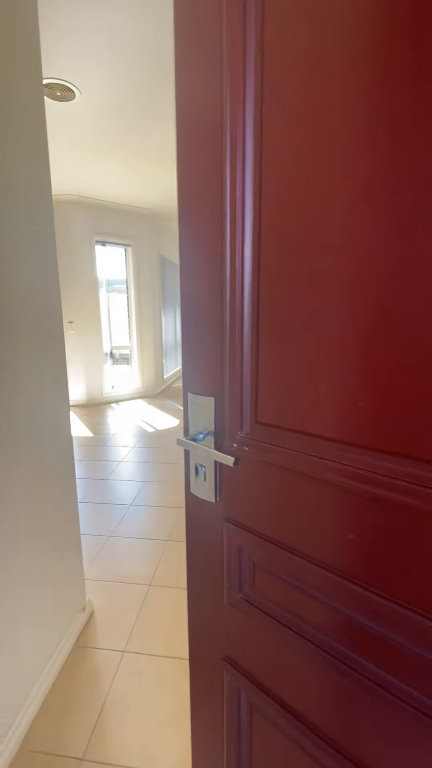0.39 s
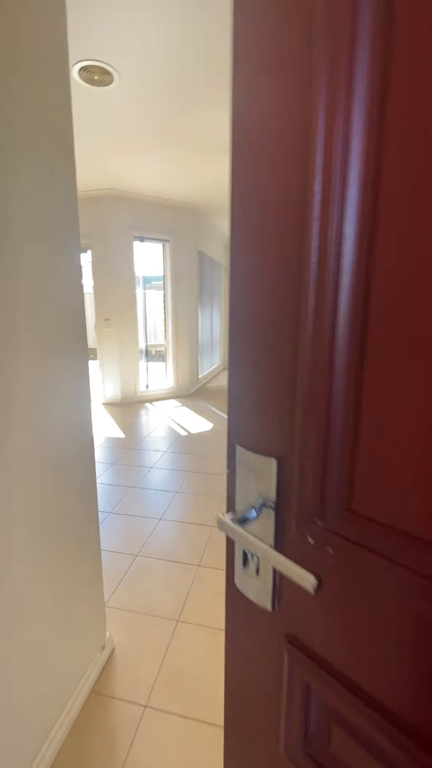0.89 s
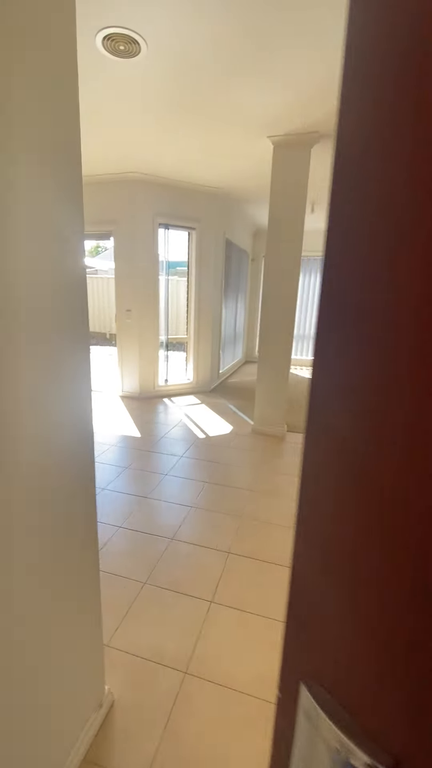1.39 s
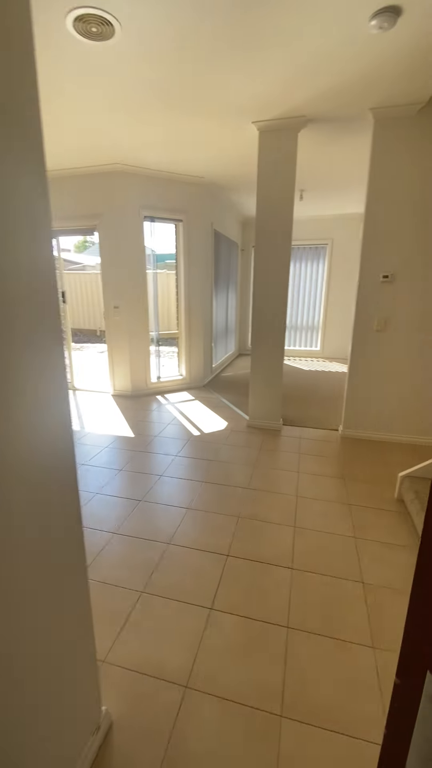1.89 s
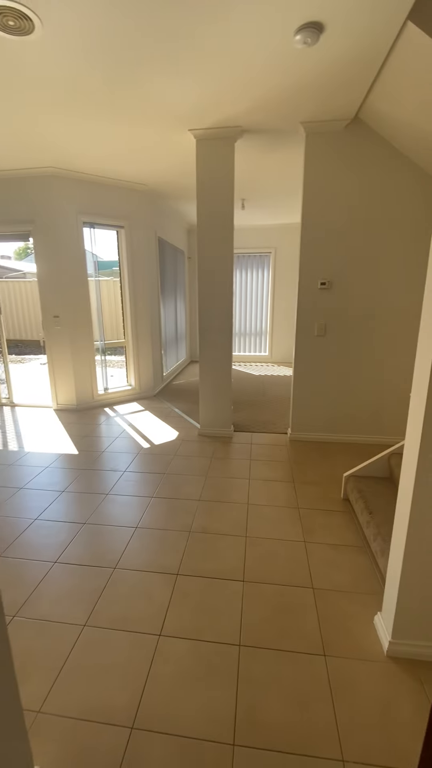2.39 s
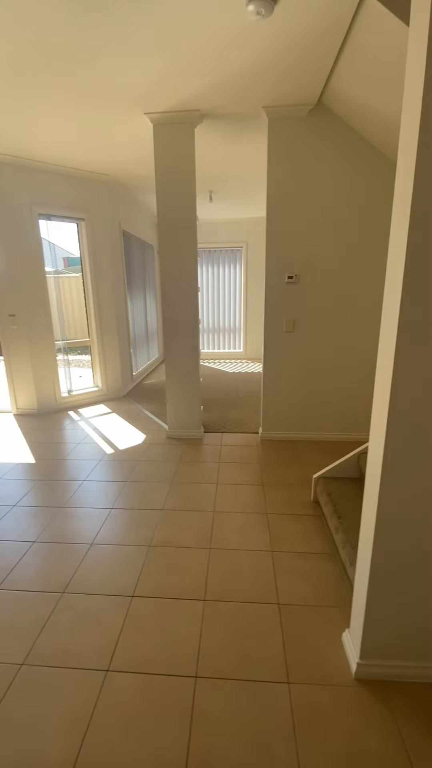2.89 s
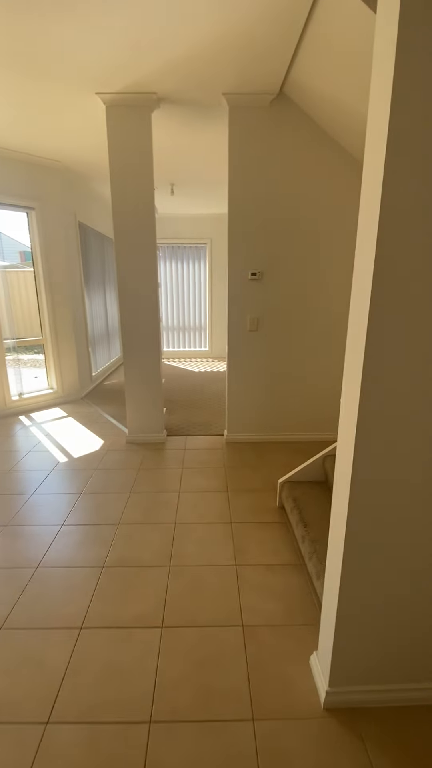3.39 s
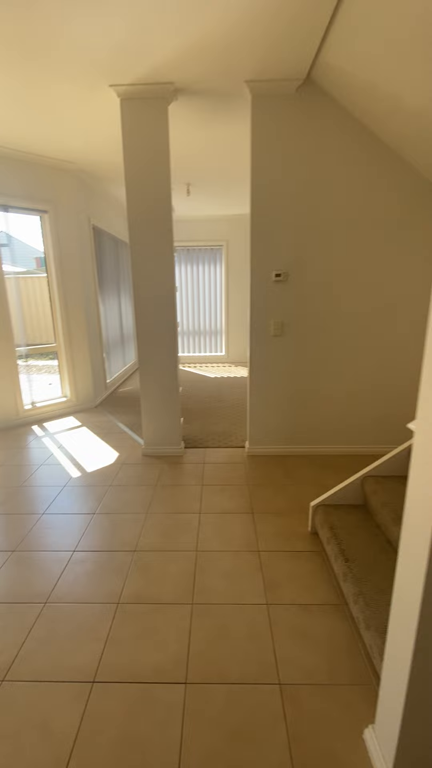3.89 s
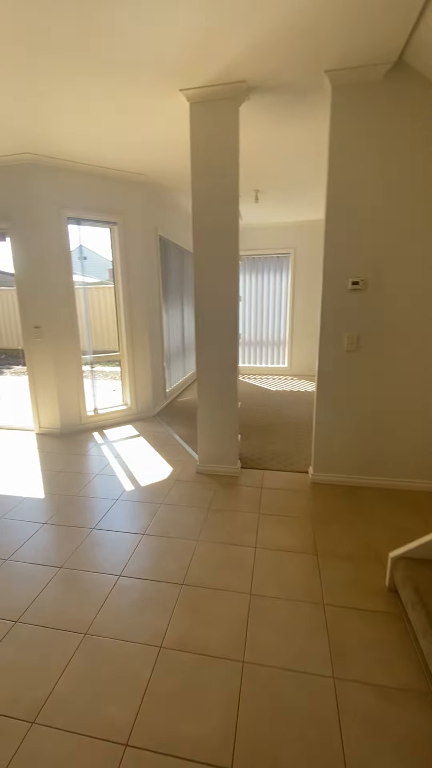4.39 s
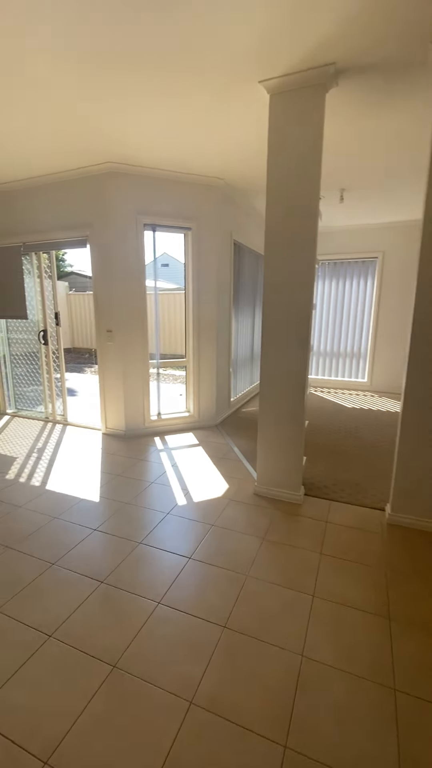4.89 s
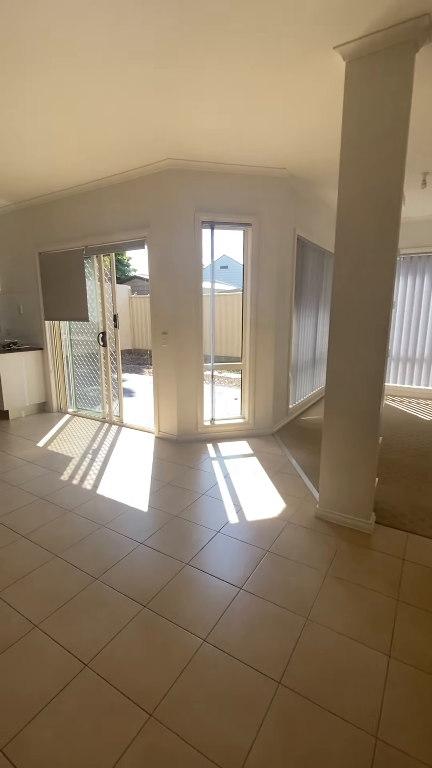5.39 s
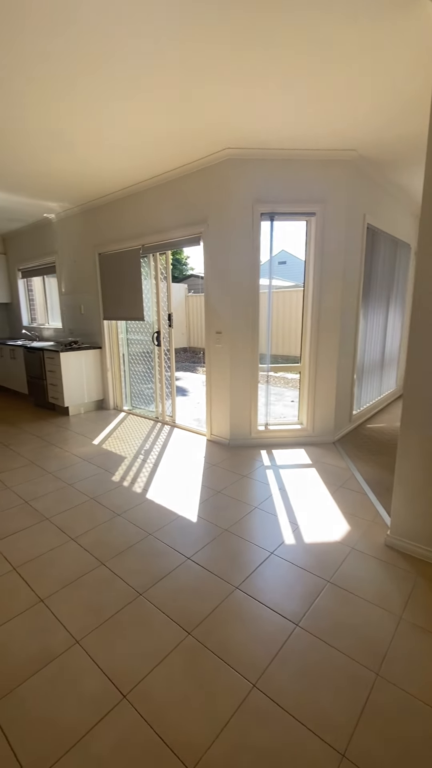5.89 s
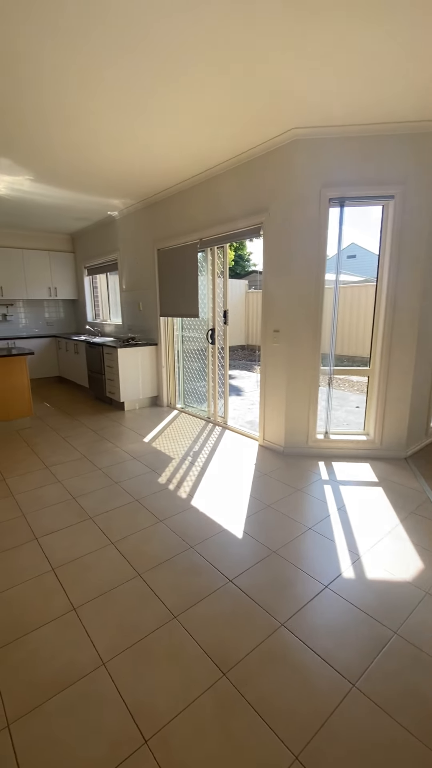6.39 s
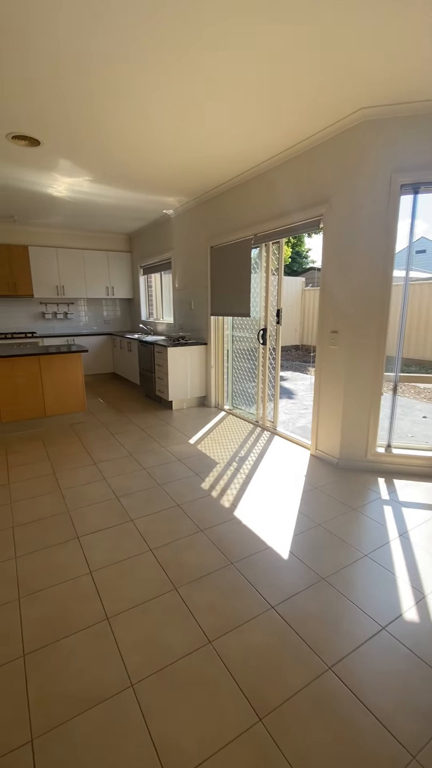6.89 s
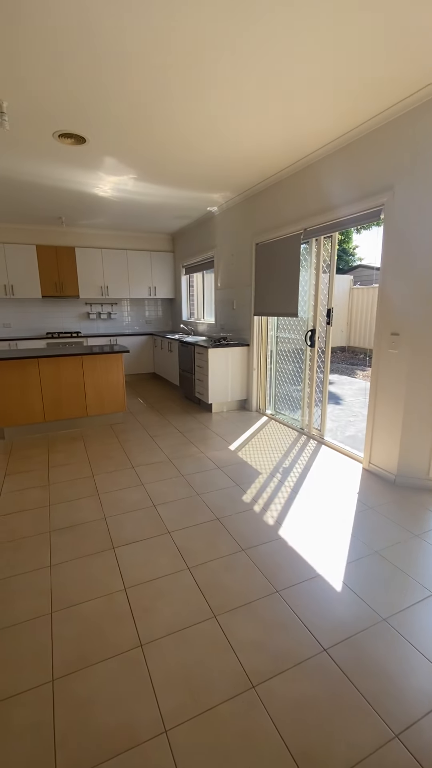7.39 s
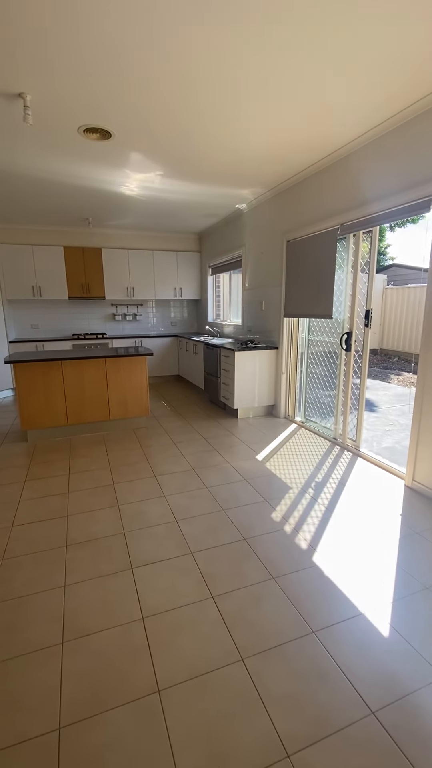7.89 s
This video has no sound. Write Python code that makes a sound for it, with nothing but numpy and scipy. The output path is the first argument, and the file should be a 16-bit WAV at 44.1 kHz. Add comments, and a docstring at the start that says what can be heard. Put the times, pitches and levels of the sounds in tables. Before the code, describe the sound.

Small birds chirp as a front door opens with clicks, a short squeak and metallic clanks, then air hiss, thuds and scuffing shoes in bare rooms.

```python
"""A front door opens into an empty tiled house: the handle clicks, a hinge squeaks and the latch clanks, and the air
cylinder of the screen door hisses before it hits its frame. Lock and handle are noise bursts and ringing metal, the
hinge a wavering pitch with its octave, the air banded noise. Shoes scuff on the tiles as gritty bursts over low
thuds. Small birds chirp outside as gliding, rasping tones and ring through the bare rooms, over far traffic of
shaped noise and a deep buffeting of the phone."""
import sys
import numpy as np
from scipy import signal
from scipy.fft import rfft, irfft, next_fast_len
from scipy.io import wavfile
from scipy.ndimage import uniform_filter1d, map_coordinates

SR = 44100
rng = np.random.default_rng(int(sys.argv[2]) if len(sys.argv) > 2 else 0)


def boost_factor(decibels):
    """Convert a level in decibels to a linear amplitude factor."""
    exponent = np.asarray(decibels, float) / 20
    return 10 ** exponent


def file_out(sig):
    """Save sig as 16-bit WAV at sys.argv[1]."""
    # one column per channel
    cols = np.atleast_2d(sig).T
    # limit, then scale
    lim = np.clip(cols, -1, 1)
    pcm = np.round(lim * 32767).astype(np.int16)
    wavfile.write(sys.argv[1], SR, pcm)


N = 353682

# low background along the walk: (time [s], buffeting of the phone by hand or wind [dB], traffic rumble [dB])
LOW_LEVELS = [(0, -41.5, -52), (.6, -53, -53.5), (1.15, -59, -44.5), (1.5, -51, -48), (1.8, -36.5, -51),
              (2.6, -71, -50), (3.1, -74, -55), (3.7, -59.5, -50.5), (4.4, -58.5, -57.5), (4.8, -52, -63.5),
              (5.4, -61.5, -58), (6.1, -71.5, -61.5), (6.6, -85, -65), (7.5, -74, -62.5),
              (8.02, -78, -70.5)]


def unit(x):
    """Scaled to rms 1."""
    return x / np.sqrt(np.mean(x ** 2) + 1e-20)


def along(points, hz):
    """Reads a curve of (frequency [Hz], value) points on a log frequency axis."""
    f, v = np.transpose(points)
    return np.interp(np.log(hz + 1), np.log(f + 1), v)


def curves(rows):
    """One value per sample for each column after the time."""
    s, *cols = np.transpose(rows)
    return [np.interp(np.arange(N) / SR, s, c) for c in cols]


def inside(rows, fade_s):
    """1 while a curve lasts, fading in and out just beyond its ends."""
    a, b = rows[0][0], rows[-1][0]
    return np.interp(np.arange(N) / SR, [a - fade_s, a, b, b + fade_s], [0, 1, 1, 0])


def wobble(rate):
    """A smooth random curve, rate knots a second."""
    knots = rng.standard_normal(int(N * rate / SR) + 4)
    return map_coordinates(knots, [np.arange(N) * rate / SR])


def filtered(x, response):
    """x times a complex response of frequency."""
    n = x.shape[-1]
    m = next_fast_len(n + 4096)
    return irfft(rfft(x, m) * response(np.fft.rfftfreq(m, 1 / SR)), m)[..., :n]


def coloured(x, spectrum):
    """x with its spectrum shaped by (frequency [Hz], gain [dB]) points."""
    return filtered(x, lambda hz: boost_factor(along(spectrum, hz)))


def blend(pair, alike):
    """Two unrelated signals mixed to the given left-right likeness."""
    turn = lambda hz: np.arccos(np.clip(along(alike, hz), -1, 1)) / 2
    mid, side = filtered(pair, lambda hz: np.array([np.cos(turn(hz)), np.sin(turn(hz))]))
    return np.array([mid + side, mid - side])


def rush(spectrum, alike, patchy_db):
    """Stereo noise of rms 1 with patches of random gain in time and frequency."""
    z = signal.stft(rng.standard_normal((2, N)), nperseg=512)[2]
    field = uniform_filter1d(rng.standard_normal(z.shape[1:]), size=5, axis=0)
    field = uniform_filter1d(field, size=12, axis=1)
    pair = signal.istft(z * boost_factor(patchy_db * unit(field)), nperseg=512)[1][:, :N]
    return unit(blend(coloured(pair, spectrum), alike))


def narrow(bands):
    """Fuzzy notes: narrow bands of noise around each (frequency [Hz], width [Hz], level [dB])."""
    total = 0
    for hz, width, db in bands:
        bell = lambda f: np.exp(-((f - hz) / width) ** 2)
        total = total + boost_factor(db) * unit(filtered(rng.standard_normal(N), bell))
    return total


def add(track, s, sound):
    """Lays a sound on a track at s seconds."""
    part = track[max(round(s * SR), 0):][:len(sound)]
    part += sound[:len(part)]


def burst(low_db, high_db, t60, rise, crack):
    """A dying burst of gritty noise with its own bass and treble, plus a fast-dying crack at its start."""
    grit_db, grits_per_s, crack_t60_s = 4, 350, 0.0097
    t = np.arange(SR // 3) / SR
    # (frequency [Hz], relative level [dB])
    colour = [(90, low_db - 4.5), (200, low_db + 12), (800, low_db + 8.5),
              (1300, 0), (1800, 1.5), (2400, 5.5), (2900, 4), (3800, -0.5),
              (5500, high_db + 3.5), (7500, high_db - 1), (9500, high_db - 8), (16000, high_db - 22)]
    noise = coloured(rng.standard_normal(len(t)), colour)
    bumps = np.interp(t * grits_per_s, np.arange(len(t)), rng.standard_normal(len(t)))
    rattle = boost_factor(grit_db * bumps) * boost_factor(-60 * t / t60)
    return noise * (rattle + crack * boost_factor(-60 * t / crack_t60_s)) * (1 - np.exp(-t / rise))


def direct(x, lag_s):
    """The straight path: a positive lag arrives later at the left port, a negative one at the right."""
    return filtered(np.array([x, x]), lambda hz: np.exp(-1j * np.pi * hz * lag_s * np.array([[1], [-1]])))


def rooms(sent, decay):
    """The bare rooms answer with decaying noise, in a new echo pattern every half second."""
    # stereo spread of the echoes: (frequency [Hz], left-right likeness [-1 to 1])
    tail_alike = [(100, 1), (300, 0.94), (700, 0.89), (2500, -0.54), (5500, 0.15), (12000, -.1)]
    build_up_s = 0.0017
    out, hop = np.zeros((2, N + 2 * SR)), SR // 2
    for start in range(0, N, hop):
        hz, t, z = signal.stft(rng.standard_normal((2, SR)), SR, nperseg=256)
        dying = boost_factor(-60 * t / along(decay, hz)[:, None])
        tail = blend(signal.istft(z * dying, SR, nperseg=256)[1], tail_alike)
        tail = tail * (1 - np.exp(-np.arange(tail.shape[1]) / SR / build_up_s))
        wet = signal.fftconvolve(sent[None, start:start + hop], tail / np.linalg.norm(tail[0]), axes=1)
        out[:, start:start + wet.shape[1]] += wet
    return out[:, :N]


def sided(pair, balance):
    """Leans each frequency left or right."""
    return filtered(pair, lambda hz: boost_factor(along(balance, hz) * np.array([[.5], [-.5]])))


def buffeting():
    """Hand or wind buffets the phone: deep noise that swells and sinks."""
    # (frequency [Hz], relative density [dB])
    deep_colour = [(18, -44), (30, -13.5), (48, -3), (60, 3.5), (80, -19.5), (200, -120)]
    level_db = curves(LOW_LEVELS)[0]
    return boost_factor(level_db + 3.4 * wobble(2.7)) * unit(coloured(rng.standard_normal(N), deep_colour))


def street():
    """Far traffic: a low rumble that swells a little and fades indoors, a patchy hush, a few fuzzy standing notes."""
    # colours of rumble and hush: (frequency [Hz], relative density [dB])
    rumble_colour = [(15, -42.5), (25, -25.5), (42, -9.5), (65, -0.5), (109, -4), (129, -10), (169, -10.5),
                     (199, -26), (231, -10), (330, -29.5), (430, -41), (730, -120)]
    hush_colour = [(88, -37), (150, -13), (205, -8), (241, -5.5), (381, -8.5), (466, -11.5), (569, -7.5),
                   (883, -8), (1060, -12.5), (2460, -29.5), (3060, -35), (7490, -42.5), (11800, -54.5),
                   (15400, -70), (22000, -120)]
    # stereo spread: (frequency [Hz], left-right likeness [-1 to 1])
    hush_alike = [(60, 0.8), (110, 0.88), (190, 0.64), (340, 0.29), (620, -0.42), (1110, -0.28),
                  (1980, -0.34), (3550, 0.8), (6350, 0.34), (11400, -0.28)]
    rumble_alike = [(30, 0.61), (120, 1.0), (300, 0.49)]
    # standing notes of the house: (frequency [Hz], width [Hz], level [dB])
    drone = [(236, 15, -77.5), (462.2, 14, -76), (763, 30, -80)]
    rumble_db = curves(LOW_LEVELS)[1]
    # hush from leaving the doorstep to well inside the house: (time [s], level [dB])
    hush_db, = curves([(0.7, -55.5), (7, -63)])
    rumble = boost_factor(rumble_db + 0.57 * wobble(6.7)) * rush(rumble_colour, rumble_alike, patchy_db=0.5)
    hush = boost_factor(hush_db + 0.23 * wobble(4.5)) * rush(hush_colour, hush_alike, patchy_db=2.5)
    return rumble + narrow(drone) + hush


def notes():
    """Every bird note as (time [s], length [s], first [Hz], last [Hz], level [dB], rasp)."""
    # note patterns: (delay [s], length [s], first pitch [Hz], last pitch [Hz], relative level [dB], rasp [0-1])
    rising_upper = [(-.012, .065, 4080, 5570, -9.5, 1), (.025, 0.063, 3186, 3895, 0.5, 0.22),
                    (.056, .06, 4030, 3900, 0, .15)]
    rising_lower = [(0, 0.049, 2370, 2654, -8, 0.16), (.04, 0.0796, 2970, 3100, -2.5, 0.17)]
    stepped = [(-.02, .075, 4630, 5300, -5, 0.8), (0, .075, 3570, 3520, -1, 0.17),
               (.055, 0.091, 3110, 2993, -6, .3)]
    # rising chirps in two voices: (time [s], level [dB], upper pitch [times pattern], lower pitch [times pattern])
    chirps = [(.403, -47.5, 1.023, 1.13), (4.675, -56.5, 0.99, 0.99), (7.362, -62.5, .97, 1.02)]
    # stepped calls: (time [s], level [dB], pitch [times pattern], added rasp [0-1])
    stepped_calls = [(6.119, -66, 1, 0), (6.771, -65.5, 1.02, 0.19)]
    # falling sweeps from one top pitch: (time [s], length [s], last pitch [Hz], level [dB], rasp [0-1])
    sweeps = [(2.221, 0.079, 3190, -51, .4), (3.873, .11, 2960, -56, 0.26),
              (6.207, .075, 3400, -51.5, 0.14), (7.468, 0.11, 3810, -62.5, 0.25)]
    # further whistles and hazy or lower voices of the calls:
    # (time [s], length [s], first pitch [Hz], last pitch [Hz], level [dB])
    further_voices = [(0, 0.16, 5740, 5300, -69.5), (0.228, 0.23, 4000, 4220, -69.5),
                      (0.381, 0.071, 4530, 3430, -53), (4.712, 0.098, 4900, 5370, -66.5),
                      (4.788, 0.095, 3800, 4140, -63), (4.818, 0.062, 3300, 3170, -66.5),
                      (5, 0.085, 5040, 5500, -81), (5.06, 0.092, 4330, 3170, -69),
                      (5.199, .14, 4040, 3074, -75.5), (6.119, 0.084, 4130, 3890, -62),
                      (6.257, 0.056, 3000, 2330, -63), (6.61, 0.092, 6330, 5580, -79),
                      (7.324, .045, 2895, 2950, -70), (7.437, 0.032, 5500, 5830, -71),
                      (7.5, 0.099, 2110, 2826, -69), (7.503, 0.15, 2975, 3334, -68.5)]
    sweep_top_hz = 4870
    level_rasp, blurring_hz_per_s = 0.28, 23500  # a glide this fast adds full rasp to that of a level note
    calls = [(rising_upper, s, db, upper, 0) for s, db, upper, lower in chirps]
    calls += [(rising_lower, s, db, lower, 0) for s, db, upper, lower in chirps]
    calls += [(stepped, *row) for row in stepped_calls]
    sung = []
    for pattern, s, db, pitch, blur in calls:
        for delay, length, first_hz, last_hz, note_db, rasp in pattern:
            sung.append((s + delay, length, first_hz * pitch, last_hz * pitch, db + note_db, rasp + blur))
    for s, length, *rest in sweeps:
        sung.append((s, length, sweep_top_hz, *rest))
    for s, length, first_hz, last_hz, db in further_voices:
        glide = abs(last_hz - first_hz) / length
        sung.append((s, length, first_hz, last_hz, db, level_rasp + glide / blurring_hz_per_s))
    return sung


def birds():
    """Gliding whistles with a weak octave; rasp shakes the pitch until the line blurs, and the level flutters."""
    track, tremble, flutter = np.zeros(N), wobble(600), boost_factor(2.5 * wobble(70))
    for s, length, first_hz, last_hz, db, rasp in notes():
        u = np.linspace(0, 1, round(length * SR))
        phase = 2 * np.pi * np.cumsum(first_hz + (last_hz - first_hz) * u) / SR
        phase = phase + 3.75 * np.clip(rasp, 0, 1) * tremble[round(s * SR):][:len(u)]
        swell = np.sqrt(np.abs(np.sin(np.pi * u)))
        add(track, s, boost_factor(db) * swell * (np.sin(phase) + boost_factor(-30.5) * np.sin(2 * phase)))
    return track * flutter


def floor():
    """The floor, like the door panel, swells into a low note under each weight and shudders around it."""
    # weight landing on the floor: (time of the crest [s], level [dB], rise [s], fall [s])
    thuds = [(1.39, -32.5, 0.016, 0.0067), (1.619, -34.5, 0.01, 0.29), (1.758, -21, 0.035, 0.072),
             (1.831, -30.5, 0.019, 0.1), (1.919, -27.5, 0.011, 0.033), (2.441, -32.5, 0.06, 0.073),
             (3.491, -27, 0.08, 0.04), (3.6, -37.5, 0.033, 0.02), (3.78, -39, 0.021, 0.032),
             (3.877, -31.5, 0.015, 0.058), (3.958, -32.5, 0.012, 0.039), (4.206, -40.5, 0.062, 0.036),
             (4.375, -34.5, 0.035, 0.049)]
    # the door panel booming under the hand: (time of the crest [s], level [dB], pitch [Hz], rise [s], fall [s])
    panel = [(0.749, -29.5, 144.6, 0.0031, 0.0077), (1.04, -42, 213, 0.0076, 0.044),
             (1.142, -48, 240, 0.016, .04)]
    # shudder of floor and door: (frequency [Hz], relative density [dB])
    slab = [(40, -44.5), (90, 6.5), (150, 4), (260, -10.5), (500, -17), (1200, -46), (3000, -120)]
    floor_hz = 73.5
    note, weight = np.zeros(N), np.zeros(N)
    t = np.arange(-SR // 4, SR // 4) / SR
    booms = [(s, db, floor_hz, rise, fall) for s, db, rise, fall in thuds] + panel
    for s, db, hz, rise, fall in booms:
        shape = boost_factor(db) * np.exp(-(t / np.where(t < 0, rise, fall)) ** 2)
        add(note, s + t[0], shape * np.cos(2 * np.pi * hz * t))
        add(weight, s + t[0], shape)
    return note + boost_factor(-12.0) * weight * unit(coloured(rng.standard_normal(N), slab))


def shoes_and_frame():
    """Soles scuff the tiles and the screen door hits its frame: gritty bursts through one set of hollow resonances."""
    # shoe contacts, and the screen door hitting its frame at 3.56 s:
    # (time [s], relative level [dB], body [dB], grit [dB], scuff t60 [s])
    contacts = [(2.2275, -43.5, -0.5, -8, 0.1), (2.332, -36.5, -3, -7, 0.083), (2.4254, -47, 6, -1, 0.12),
                (2.575, -46, -3.5, -2, 0.16), (3.33, -45.5, 5.5, -22, 0.37), (3.389, -49, 9, -28, 0.25),
                (3.4834, -34.5, 0, -6.5, 0.096), (3.5591, -27.5, -10.5, -13, 0.14),
                (3.5861, -42, -1.5, 0, 0.11), (3.7198, -46, -14, -7, 0.14), (3.8329, -47, 4, -11, 0.13),
                (3.9234, -50, -12, 5, .14), (4.1263, -46.5, -2.5, -22, 0.089),
                (4.2478, -52.5, -12, -15, 0.078), (4.2794, -56.5, 2.5, -10, 0.26),
                (4.3244, -56, 6, -13, 0.046), (4.5187, -63.5, 11.5, -34, 0.07),
                (5.2246, -67, -3, -6, 0.074), (5.5992, -72.5, -2, -2.5, 0.081), (5.9694, -80, -7, 3, 0.031),
                (7.2532, -58.5, 2, -32, 0.069), (7.2778, -54.5, -7, -32, 0.064),
                (7.9552, -68, -6, -29, 0.034)]
    # hollow of the shoe on tile: (frequency [Hz], width [Hz], gain [dB])
    sole = [(771, 234, 1), (1630, 130, -2.5), (2480, 640, 0.5), (3100, 230, -2), (4000, 580, 1)]
    tap_rise_s, tap_t60_s = .002, 0.086  # a plain tap
    track = np.zeros(N)
    for s, db, body_db, grit_db, t60 in contacts:
        rise = tap_rise_s * (t60 / tap_t60_s) ** 2  # a longer scuff slides in
        add(track, s, boost_factor(db + 4) * burst(body_db, grit_db, t60, rise, crack=1.1))

    def hollow(f):
        gain = 1
        for hz, width, db in sole:
            gain = gain + (boost_factor(db) - 1) * 1j * f * width / (hz ** 2 - f * f + 1j * f * width)
        return gain
    return filtered(track, hollow)


def closer():
    """Air squeezed through the cylinder's valve: banded noise, fluttering a little."""
    # air through the valve: (time [s], level [dB])
    flow = [(.8, -76.5), (1.25, -55), (1.85, -41), (2.1, -40.5), (2.25, -45.5), (2.95, -52), (3.38, -49.5),
            (3.7, -58), (4.05, -79)]
    # colour of the jet: (frequency [Hz], relative density [dB])
    jet_colour = [(1180, -28.5), (2000, -28), (2430, -20.5), (2750, -22.5), (2990, -31.5), (3220, -21.5),
                  (4110, -16.5), (4470, -18), (5880, -9.5), (7030, -17), (7630, -18.5), (8400, -21.5),
                  (9530, -24.5), (11100, -26.5), (11800, -20), (15400, -32), (22000, -59)]
    # stereo spread of the jet: (frequency [Hz], left-right likeness, limited to -1 to 1)
    jet_alike = [(60, 0.77), (97, 0.93), (160, 0.94), (250, 0.92), (400, 0.45), (650, -0.01), (1050, -0.24),
                 (1690, -0.31), (2720, -1.3), (4380, 0.017), (7060, 0.58), (11400, -0.42)]
    # whistle bands of the jet: (frequency [Hz], width [Hz], boost [dB])
    valve = [(5860, 680, 6.5), (7550, 320, 2), (9400, 600, 6.5)]
    flow_db, = curves(flow)
    whistle = lambda f: boost_factor(sum(db * np.exp(-((f - hz) / width) ** 2) for hz, width, db in valve))
    jet = unit(filtered(rush(jet_colour, jet_alike, patchy_db=1.25), whistle))
    return inside(flow, .05) * boost_factor(flow_db + 0.33 * wobble(35)) * jet


def hinge():
    """Stick-slip at one wavering pitch, its octave growing with the grip; the swinging leaf groans at the start."""
    # grip of the hinge: (time [s], level [dB])
    squeak = [(1.512, -58.5), (1.535, -42), (1.546, -24.5), (1.554, -36.5), (1.562, -28), (1.578, -36),
              (1.6, -53), (1.64, -52)]
    # the swinging door leaf: (frequency [Hz], width [Hz], level before it dies away [dB])
    leaf = [(644, 17, -65), (905, 25, -65.5)]
    hinge_hz, groan_s = 2075, 0.22
    t = np.arange(N) / SR
    db, = curves(squeak)
    phase = 2 * np.pi * hinge_hz * t + 0.47 * wobble(120)
    grip = inside(squeak, .01) * boost_factor(db + 1.5 * wobble(90))
    groan = narrow(leaf) * np.exp(-(t / groan_s) ** 4)
    return grip * (np.sin(phase) + 3 * grip * np.sin(2 * phase)) + groan


def latch():
    """Each contact rings the lock's metal at new strengths inside a short rattle."""
    # lock and handle contacts: (time [s], relative level [dB], knock of the wood [dB], brightness [dB], rattle t60 [s])
    contacts = [(0.0885, -46.5, -21, -13, 0.017), (0.7364, -34.5, 3.5, -21, 0.028),
                (0.9424, -39, -5.5, -21, 0.019), (1.0286, -51.5, 4, -14.5, 0.052),
                (1.1169, -39, -9.5, -8, 0.038), (1.5554, -42.5, -7, -14.5, 0.14),
                (1.6432, -23.5, -11.5, -10.5, 0.091), (1.6513, -20.5, -15, -1.5, 0.03),
                (1.6773, -30, -5, -5.5, 0.055), (1.7348, -33, -8.5, 3.5, 0.06),
                (1.7545, -33, -7, -9.5, 0.2), (1.8094, -42, 1.5, -13, 0.12)]
    # ringing notes of the lock: (frequency [Hz], relative level [dB], t60 [s])
    metal = [(1297, 0, .06), (2137, -3, .06), (2374, -3, .06), (2750, -6, .04), (4737, -8, .04),
             (5450, -5, .025), (7300, -10, .015)]
    track, t = np.zeros(N), np.arange(SR // 3) / SR
    for s, db, knock_db, bright_db, t60 in contacts:
        strength_db = rng.normal(0, 3, len(metal))
        ring = np.zeros(len(t))
        for (hz, level, life), extra_db in zip(metal, strength_db):
            level = level + extra_db + bright_db * (hz > 4500)
            ring += boost_factor(level - 60 * t / life) * np.sin(2 * np.pi * hz * t)
        rattle = burst(knock_db, bright_db, t60, rise=0.0011, crack=0.94)
        add(track, s, boost_factor(db + 5) * rattle + boost_factor(db - 15.5) * ring)
    return track


def scene():
    """Door behind the walker, feet below, birds outside: drier on the doorstep than indoors."""
    # decay of the bare tiled rooms, then of birdsong between the walls and down the rooms: (frequency [Hz], t60 [s])
    room_decay = [(80, 0.74), (500, 0.8), (2500, 0.79), (6000, 0.31), (12000, 0.17)]
    song_decay = [(2000, 1), (3000, 1), (4200, 0.69), (6000, 0.55), (12000, 0.11)]
    # share of the lock's sound that enters the house as the walker passes the door: (time [s], level [dB])
    door_sent = [(1.2, -8), (1.6, -5.5)]
    # lean of door and feet, of the jet, of background and birds: (frequency [Hz], left over right [dB])
    near_side = [(60, 1.5), (140, -2.5), (340, 1), (830, 2), (1980, 1.5), (4750, -4.5), (11400, 4.5)]
    jet_side = [(60, -0.5), (170, -2.5), (490, -1), (1400, 5), (3990, -4), (11400, 2.5)]
    far_side = [(60, 0.5), (170, -0.5), (490, 1.5), (1400, 3.5), (3990, -2.5), (11400, 2.5)]
    clicks, squeak, hits, thuds, song = latch(), hinge(), shoes_and_frame(), floor(), birds()
    door_db, = curves(door_sent)
    indoors_db = np.interp(np.arange(N) / SR, [.8, 3], [-10, -2.5])
    near = direct(clicks + squeak + thuds + hits, lag_s=0.00015)
    sent = boost_factor(door_db) * clicks + boost_factor(-11.0) * squeak + boost_factor(-5.5) * hits + boost_factor(-10.5) * thuds
    echo = rooms(sent, room_decay)
    ringing_song = direct(song, lag_s=-0.00005) + rooms(boost_factor(indoors_db) * song, song_decay)
    background = ringing_song + street() + buffeting()
    return sided(near + echo, near_side) + sided(closer(), jet_side) + sided(background, far_side)


def roll_off(x):
    """The treble ends steeply here."""
    return signal.sosfilt(signal.butter(12, 15760, fs=SR, output="sos"), x)


def record(dry):
    """A phone: thin in the deepest bass; near the top only the difference of its two ports is kept."""
    bass_hz, shared_top_hz = 30, 11600
    bass = lambda hz: hz ** 2 / (hz ** 2 + bass_hz ** 2)
    mid = filtered((dry[0] + dry[1]) / 2, lambda hz: bass(hz) / (1 + (hz / shared_top_hz) ** 30))
    side = filtered((dry[0] - dry[1]) / 2, bass)
    return roll_off(np.array([mid + side, mid - side]))


dry = scene()
out = record(dry)
file_out(out)
```